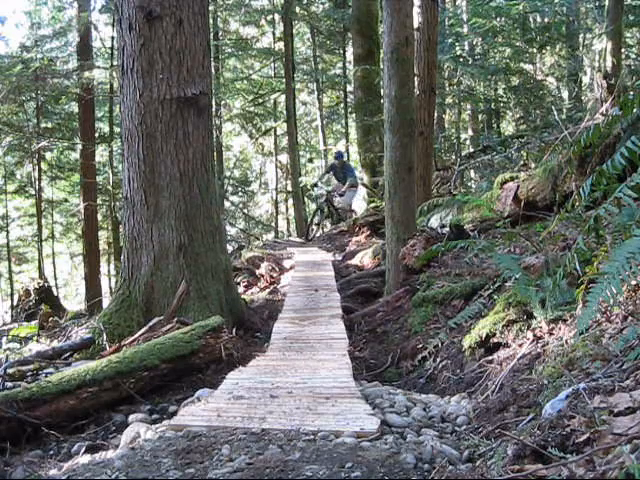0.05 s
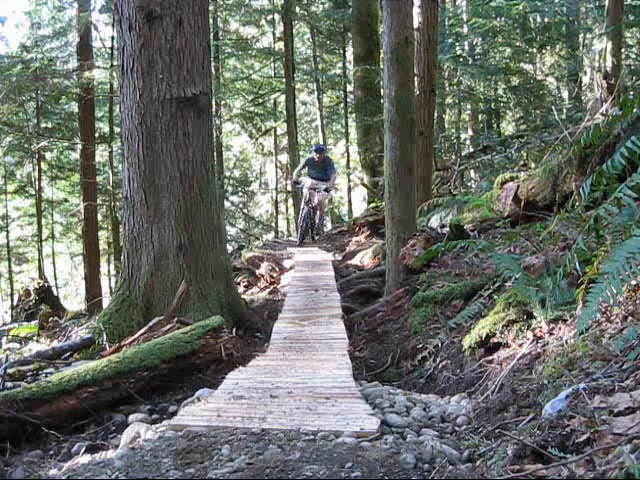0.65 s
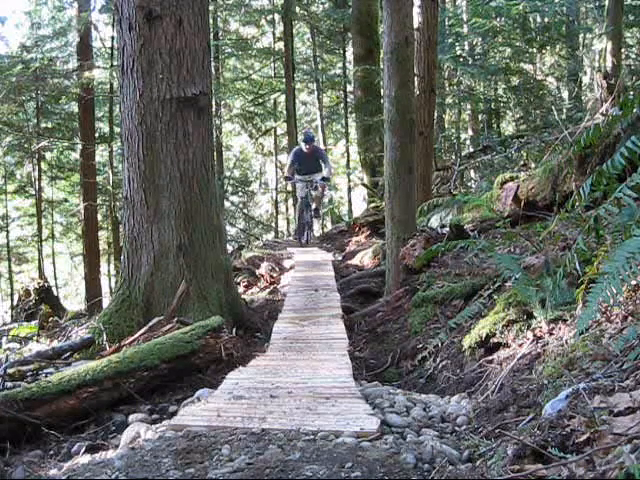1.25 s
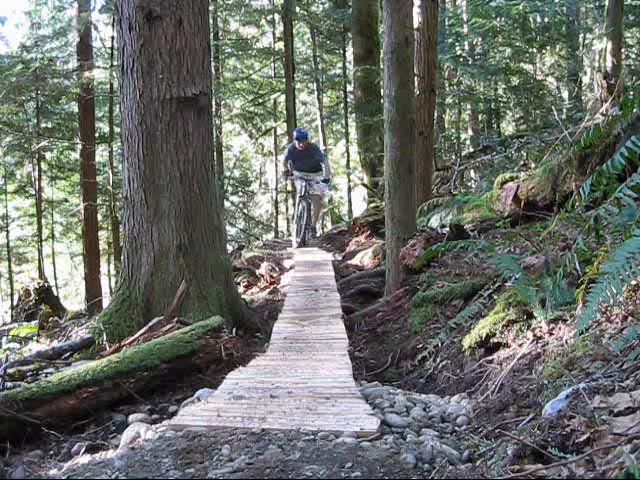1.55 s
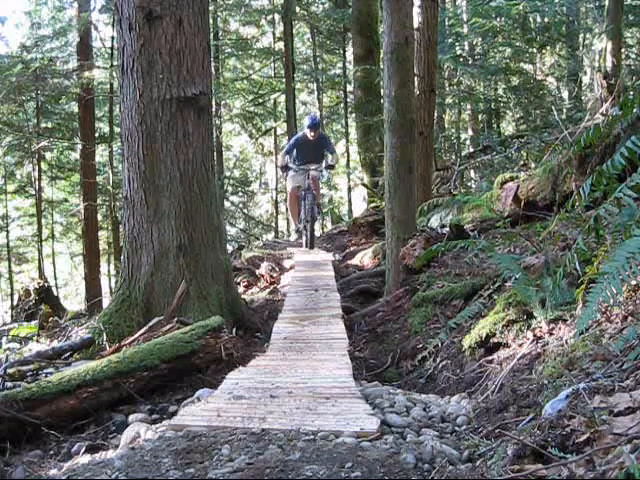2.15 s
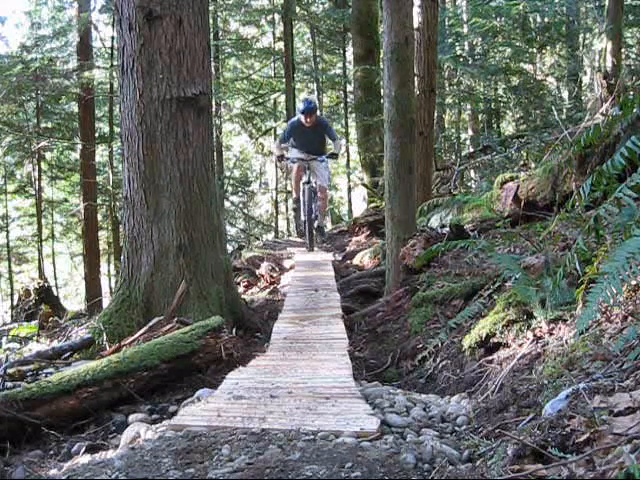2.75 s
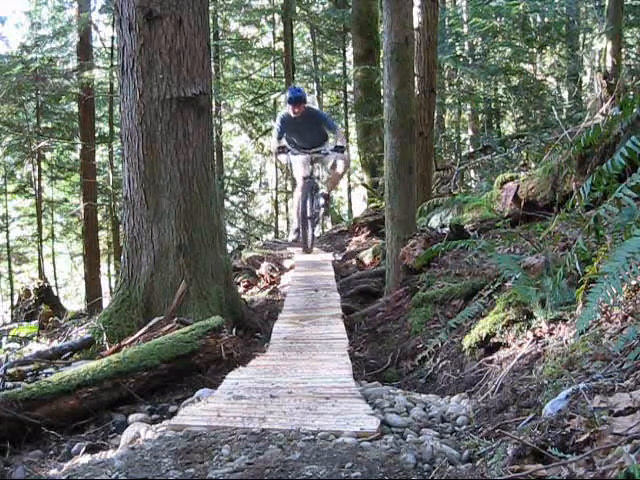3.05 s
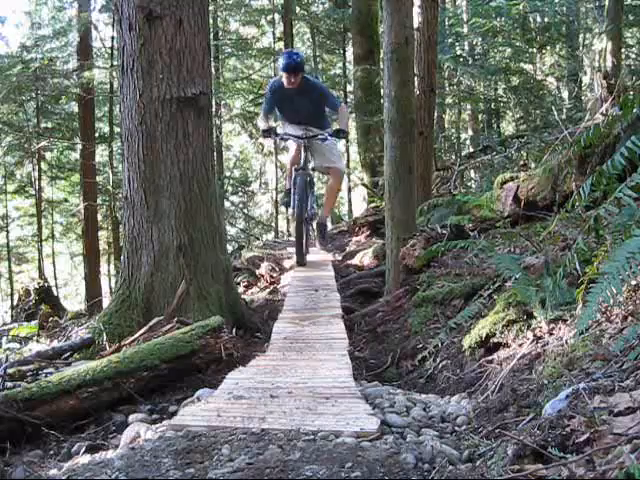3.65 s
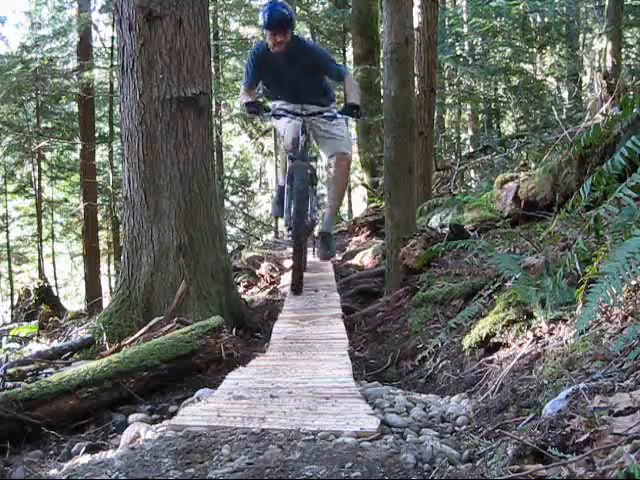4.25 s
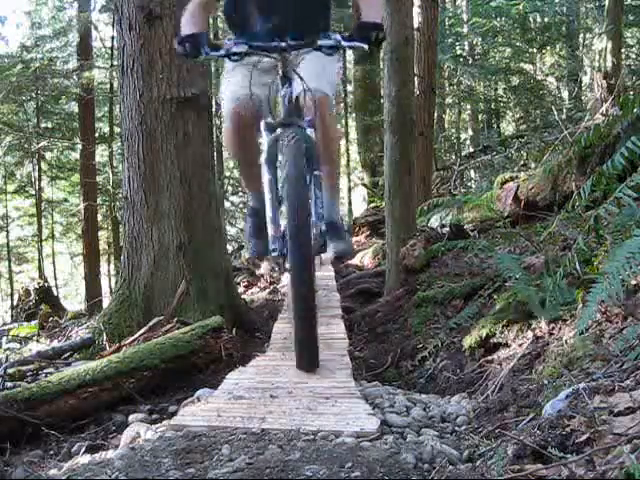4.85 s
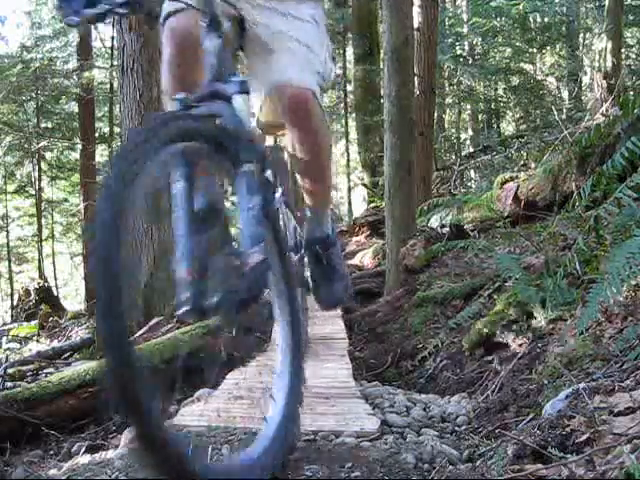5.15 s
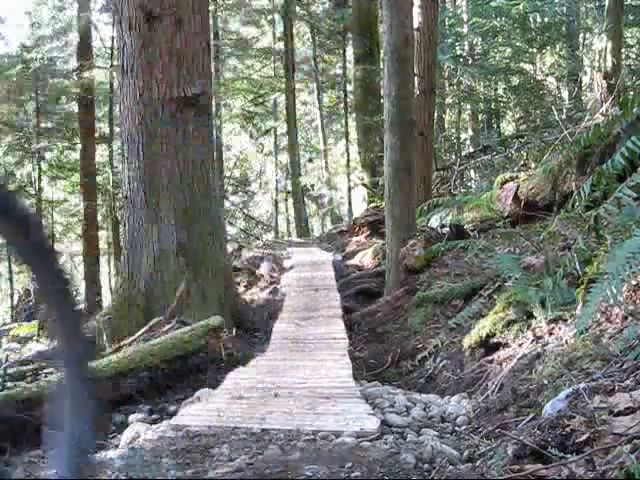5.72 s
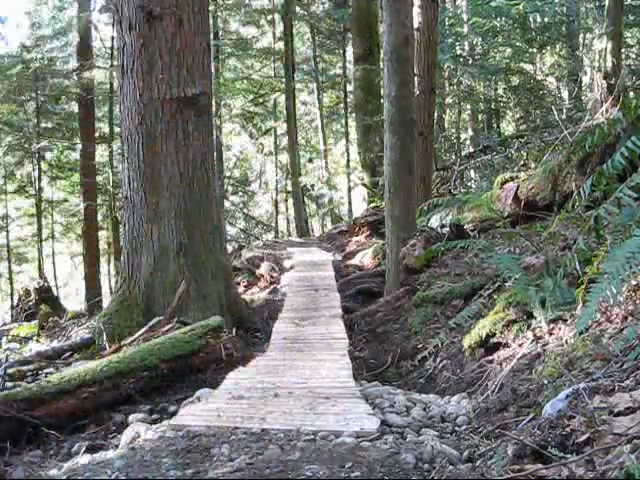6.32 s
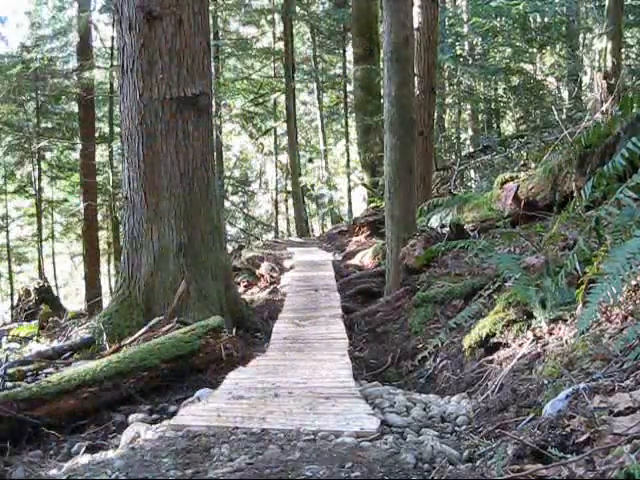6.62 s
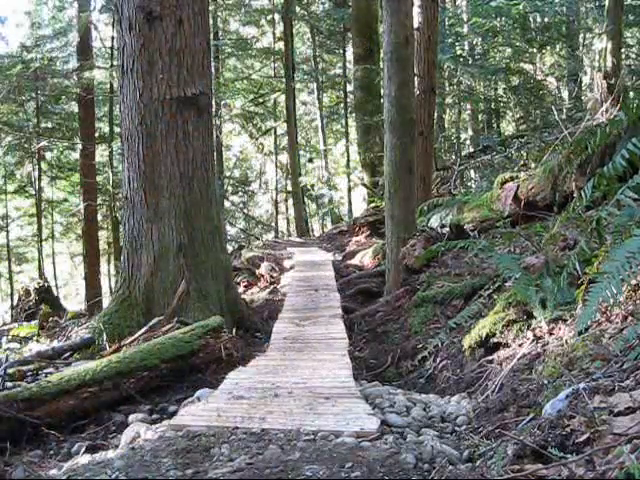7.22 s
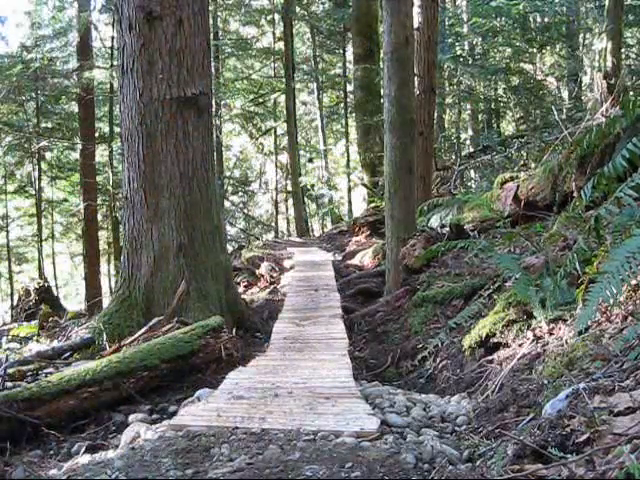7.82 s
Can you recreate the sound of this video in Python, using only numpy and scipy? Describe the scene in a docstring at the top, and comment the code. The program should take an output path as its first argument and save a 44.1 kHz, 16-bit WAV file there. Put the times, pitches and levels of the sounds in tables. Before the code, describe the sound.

In a quiet forest, distant bicycle tyres tick over stones and grow louder, drumming across a wooden plank bridge. The chain slaps the frame in sharp metallic clacks and boards knock hollowly. The bike passes right by the microphone with a crunch and spray of gravel, then rumbles away and fades. A small bird chirps faintly over a soft hush.

```python
"""Far tyres tick over stones in a forest hush: a mountain bike rolls down a trail, over a plank bridge,
onto gravel close by, and away. Its knobs drum on the boards, the tread scuffs and crunches grit,
the chain slaps the frame at bumps, stones knock and loaded planks ring hollow.
Behind it are a faint small bird, a short echo off the trunks and a low far hum."""
import sys
import numpy as np
from scipy import signal
from scipy.fft import rfft, irfft, next_fast_len
from scipy.io import wavfile
from scipy.ndimage import map_coordinates

SR = 44100
rng = np.random.default_rng(int(sys.argv[2]) if len(sys.argv) > 2 else 0)


def transcribe(u):
    """Save the signal u as a 16-bit wav file named by the first command-line argument.

    u: samples, shape (n,) or (channels, n), limited to [-1, 1]; the rate is SR.
    q: integer samples, one column per channel.
    """
    v = np.clip(np.atleast_2d(u).T, -1, 1)
    q = np.round(v * 32767).astype(np.int16)
    wavfile.write(sys.argv[1], SR, q)


N = 347640

# Tyre fader as the bike nears and leaves: t/s, level/dB
TYRE_FADER = [(0.0, -58), (0.44, -51.5), (2.06, -52), (2.65, -47.5), (2.74, -51), (3.58, -47.5),
              (3.71, -46), (4.1, -45), (4.32, -41), (4.45, -41.5), (4.65, -39), (4.83, -40), (5.79, -33),
              (5.9, -35.5), (6.25, -42.5), (6.76, -49.5), (7.33, -53), (7.88, -55.5)]
def tyre_level_db():
    """The fader that tyres and pebbles ride, near 0 dB at its peak."""
    return curve(TYRE_FADER) + 34


def tyres():
    """Rolling rubber in five layers, from low rumble to fine spray."""
    roll_db, scuff = tyre_level_db(), scuff_gain()
    jolt = np.tanh(wobble(38))  # the rumble and crunch swell and dip unevenly, without sudden surges
    return rumble(roll_db, jolt) + rasp(scuff) + crunch(roll_db, jolt, scuff) + grit(roll_db) + spray(roll_db)


# Body resonances of boards and tyre casing: f/Hz, width/Hz, level/dB
BOARD_MODES = [(110, 30, -8.5), (170.5, 29, -1.5), (189, 41, -6), (361, 44, -6), (450, 150, -2.5),
               (680, 170, -2.5), (970, 280, -7.5)]
# Thud EQ: f/Hz, level/dB
THUD_EQ = [(25, -10), (60, -24), (120, -5), (200, 8), (400, 7.5), (750, 3.5), (1200, -11), (2500, -36)]
# Low-end swells, off the bridge's end and on packed earth: t/s, attack/s, hold/s, release/s, boost/dB
BRIDGE_DROP = (5.52, 0.13, 0.087, 0.055, 3.7)
PACKED_EARTH = (6.08, 0.5, 0.63, 0.99, 7.9)
def rumble(roll_db, jolt):
    """Knobs drum on the boards over a bed of dull, uneven thuds."""
    knobs = contacts(rate=900, spread_db=2.5) * amp(2.7 * jolt)
    thuds = contacts(rate=900, spread_db=9) * amp(1.5 * jolt)
    level_db = -39.5 + 1.424 * roll_db + swell(*BRIDGE_DROP) + swell(*PACKED_EARTH)
    return amp(level_db) * (amp(-0.5) * resonate(knobs, BOARD_MODES) + amp(-4) * coloured(thuds, THUD_EQ))


# Steering scuff cues: t/s, length after the attack/s, level/dB
SCUFF_CUES = [(1.6, 0.1, -56.5), (2.136, 0.083, -46), (2.978, 0.28, -51), (3.805, 0.37, -50.5),
              (4.256, 0.17, -40), (4.645, 0.07, -43), (4.77, 0.13, -38), (5.207, 0.13, -38),
              (6.516, 0.19, -52)]
def scuff_gain():
    """Each scuff bites quickly, holds and lets go."""
    return sum(swell(s, attack=0.027, hold=0.44 * length, release=0.56 * length, height=amp(db))
               for s, length, db in SCUFF_CUES)


# Tread resonances: f/Hz, width/Hz, level/dB
TREAD_MODES = [(1260, 200, -0.5), (2080, 310, 1)]
def rasp(scuff):
    """The tread rubs sideways as the rider steers."""
    friction = rng.standard_normal(N) * amp(5 * wobble(90))
    return amp(-1) * scuff * resonate(friction, TREAD_MODES)


# Mid-forward crunch EQ: f/Hz, level/dB
CRUNCH_EQ = [(400, -5.5), (800, -8), (1150, -2.5), (1600, 1), (2150, 2.5), (3000, 0.5), (4500, -2.5),
             (6200, -8), (8500, -41), (16000, -28)]
def crunch(roll_db, jolt, scuff):
    """Each size of gravel cracks at its own moments, in its own octave; scuffs grind up more."""
    centres_hz = 700 * 2 ** np.arange(5)
    gravel = np.zeros(N)
    for octave in np.eye(5):
        cracks = amp(2 * jolt) * grains(rate=900, spread_db=6.5, t60=0.0061, hiss=0.44)
        gravel += filtered(cracks, lambda hz: np.sqrt(along(np.c_[centres_hz, octave], hz)))
    gain = np.hypot(amp(-35 + 1.333 * roll_db), amp(-2.5) * scuff)
    return gain * coloured(gravel, CRUNCH_EQ)


# Bright grit EQ: f/Hz, level/dB
GRIT_EQ = [(1500, -22), (4000, 8), (6500, 0), (10300, 5.5), (12000, 3.5), (15500, 1)]
def grit(roll_db):
    """Fine dirt sizzles under the tread."""
    sizzle = amp(3.7 * wobble(110)) * grains(rate=1200, spread_db=-1, t60=0.0031, hiss=1.66)
    return amp(-47.5 + 0.84 * roll_db) * coloured(sizzle, GRIT_EQ)


# Swell over the loose gravel: t/s, attack/s, hold/s, release/s, boost/dB
GRAVEL_PATCH = (5.167, 0.34, 0.5, 0.81, 11.3)
# Spray EQ: f/Hz, level/dB
SPRAY_EQ = [(1500, -9), (4000, 6), (6500, 2.5), (10300, 3), (12000, 3), (15500, 3)]
def spray(roll_db):
    """Sharp little stones fly from the wheels, only on the loose gravel."""
    stones = amp(3.3 * wobble(90)) * grains(rate=600, spread_db=7, t60=0.0053, hiss=0.5)
    looseness = amp(swell(*GRAVEL_PATCH)) - 1
    return amp(-43 + 0.84 * roll_db) * looseness * coloured(stones, SPRAY_EQ)


# Chain slap cues: t/s, level/dB, tilt/(dB per octave), high cut/Hz, t60/s
SLAP_CUES = [(2.457, -14.5, 2.5, 10000, 0.024), (2.5286, -16, 2.2, 11300, 0.038),
             (3.5385, -24.5, -1.5, 18000, 0.049), (3.648, -8, -0.4, 16000, 0.017),
             (3.6717, -26, -0.5, 12000, 0.058), (4.2372, -7, 3, 10800, 0.022),
             (4.733, -24, -2.5, 12000, 0.066), (4.7708, -24.5, -1.5, 12000, 0.043),
             (4.901, -31.5, -2.5, 11000, 0.038), (5.0483, -5, 2, 13700, 0.028),
             (5.371, -15.5, -1.5, 20000, 0.042), (5.755, -20, 0.5, 13000, 0.044),
             (5.815, -9.5, 4, 20000, 0.018), (5.9112, -14.5, -1.5, 20000, 0.054)]
# Metal ring of frame and chain: f/Hz, width/Hz, level/dB
FRAME_MODES = [(2800, 140, -4), (3360, 750, -1.5), (4120, 480, -4.5), (5020, 250, 0), (6160, 190, -2.5),
               (8770, 500, -10), (10200, 1600, -4.5), (13400, 890, -3), (15700, 980, -19)]
# EQ for the crack of steel links: f/Hz, level/dB
LINK_EQ = [(150, -37), (600, -13), (1200, -3), (2000, -5), (2900, 1), (4300, -2), (5700, -3.5), (7200, -6),
           (10500, -8.5), (13000, -7.5), (16000, -4)]
def chain():
    """Many links land within milliseconds and ring the frame; returns the direct sound and echo send."""
    direct, send = np.zeros(N), np.zeros(N)
    t = np.arange(SR // 6) / SR
    for s, db, tilt_db, top_hz, t60 in SLAP_CUES:
        rise = np.minimum(t / 0.0027, 1) ** 2
        blow = decay(np.maximum(t - 0.0025, 0), t60)
        settling = amp(-14) * decay(t, 0.084)
        envelope = rise * (blow + settling)
        links = contacts(rate=4600, spread_db=1.5, size=len(t)) + 2.55 * rng.standard_normal(len(t))
        # the chain never hits the same spot twice
        modes = [(hz * (1 + 0.0099 * rng.standard_normal()), width, level)
                 for hz, width, level in FRAME_MODES]
        hardness = lambda hz: amp(tilt_db * np.log2((hz + 500) / 5000)) / np.hypot(1, (hz / top_hz) ** 5)
        steel = lambda x: unit(filtered(coloured(x, LINK_EQ) + amp(1) * resonate(x, modes), hardness))
        strength = amp(db - 3) * np.sqrt(np.mean(envelope ** 2))
        add(direct, s, strength * steel(envelope * links))
        distance_m = np.hypot(0.9, 5.7 * (s - 7.25))  # riding at 5.7 m/s; far slaps are wetter
        send_db = -20.5 + 2.5 * np.log2(distance_m)
        # sent in all directions, the ripples of single links average out into one plain crack
        add(send, s, strength * amp(send_db) * steel(signal.unit_impulse(len(t), 128)))
    return direct, send


# Featured stone and twig hits: t/s, level/dB, f/Hz, spread/octaves
KNOCK_CUES = [(0.269, -43.5, 4600, 0.73), (0.378, -41, 5030, 0.73), (0.919, -46.5, 3120, 0.33),
              (1.264, -43.5, 4670, 0.28), (1.4386, -44, 3360, 0.32), (1.488, -40, 4220, 0.29),
              (1.578, -41.5, 1200, 0.84), (1.665, -46, 1150, 0.31), (1.9064, -40.5, 4020, 0.75),
              (2.6676, -38, 3630, 0.2), (3.0478, -41, 1540, 0.4), (3.1452, -42, 1960, 0.43),
              (3.153, -45.5, 9500, 0.6), (3.5268, -27, 3500, 0.14), (4.0737, -35, 4580, 1),
              (4.102, -37, 3630, 0.96), (4.4121, -31.5, 1400, 0.45), (4.6583, -34.5, 1580, 1.23),
              (4.6832, -33, 1650, 0.65), (4.7514, -29, 3340, 0.53), (4.946, -33, 1370, 0.3),
              (5.0323, -30, 1260, 0.37), (5.2135, -31, 3480, 0.77), (5.2849, -20.5, 3600, 0.42),
              (5.435, -30, 6000, 1.46), (5.585, -24.5, 6000, 1.2), (5.6118, -23.5, 1110, 1.04),
              (5.6802, -22, 2370, 0.68), (5.873, -23, 11300, 0.45), (5.884, -22.5, 11900, 0.42),
              (5.9286, -22.5, 12000, 0.3), (5.9699, -26.5, 7000, 1), (6.279, -36, 2170, 0.79),
              (6.379, -41, 2000, 1), (6.5872, -41.5, 800, 0.23), (6.6398, -40, 1510, 0.54),
              (6.9965, -31, 1070, 0.55), (7.4322, -34.5, 1130, 0.7)]
def knocks():
    """Dead little blows: hard contact, quick crumble, scrape; small stones are higher and stop sooner."""
    out = np.zeros(N)
    lead = 128  # samples of room for the filter's pre-ring
    t = np.arange(SR // 20) / SR
    for s, db, centre_hz, spread in list(KNOCK_CUES) + pebbles():
        crumble = 0.13 * decay(t, 0.00066)
        scrape = 0.11 * decay(t, 0.045 / (1 + (centre_hz / 5000) ** 2))
        blow = (t == 0) + (crumble + scrape) * rng.standard_normal(len(t))
        band = lambda hz: np.exp(-abs(np.log2((hz + 1) / centre_hz) / (2 * spread)) ** 3) / np.sqrt(hz + 200)
        knock = filtered(np.pad(blow, (lead, 0)), band)
        add(out, s - lead / SR, amp(db + 25) * knock / np.linalg.norm(knock))
    return out


def pebbles(per_s=15, spread_octaves=0.46):
    """Lesser stones strike at random, as loud as the tyres allow; returns extra knock cues."""
    slots = np.arange(int(per_s * N / SR))
    when, size, pitch = rng.random((len(slots), 3)).T
    s = (slots + when) / per_s
    db = -32.5 + 1.05 * tyre_level_db()[(s * SR).astype(int)] + 1.732 * (size - 0.5)
    # hard stones up the trail, duller knocks on boards and earth later
    hz = 2990 * 2 ** (1.316 * (pitch - 0.5) - 0.18 * s)
    return [(*row, spread_octaves) for row in zip(s, db, hz) if row[0] > 0.01]


# Hollow notes of boards and roots under the wheels: t/s, level/dB, f/Hz, t60/s
WOOD_CUES = [(3.5115, -37.5, 436, 0.028), (3.915, -42, 347, 0.087), (4.0422, -30.5, 485, 0.034),
             (4.6553, -33.5, 683, 0.15), (4.772, -29.5, 666, 0.069), (4.8294, -30, 680, 0.042),
             (5.279, -23, 700, 0.024), (5.680, -20, 770, 0.025), (5.7174, -21, 544, 0.024),
             (5.8017, -25, 350, 0.028), (6.62, -37, 262, 0.036), (7.4302, -26, 967, 0.038)]
def wood():
    """A loaded board rings briefly on its bending note and a faster-dying overtone."""
    out = np.zeros(N)
    t = np.arange(SR // 4) / SR
    attack = 1 - np.exp(-t / 0.00075)
    for s, db, hz, t60 in WOOD_CUES:
        note = np.sin(2 * np.pi * hz * t) * decay(t, t60)
        overtone = amp(1.5) * np.sin(2 * np.pi * 2.03 * hz * t) * decay(t, 0.42 * t60)
        add(out, s, amp(db) * attack * (note + overtone))
    return out


# Bird cues: t/s, length/s, start f/Hz, middle f/Hz, end f/Hz, level/dB
BIRD_CUES = [(2.007, 0.026, 6900, 6660, 7040, -49), (2.06, 0.033, 6750, 6100, 4480, -50),
             (2.24, 0.045, 6750, 6130, 4600, -53), (7.205, 0.029, 4300, 4200, 4050, -49),
             (7.352, .04, 5450, 5580, 5640, -56), (7.52, .04, 5350, 5500, 5380, -52)]
def bird():
    """Thin, quickly bending whistles."""
    out = np.zeros(N)
    for s, length, start_hz, middle_hz, end_hz, db in BIRD_CUES:
        progress = np.linspace(0, 1, int(length * SR))
        hz = np.polyval(np.polyfit([0, 0.5, 1], [start_hz, middle_hz, end_hz], 2), progress)
        add(out, s, amp(db - 2) * np.sin(np.pi * progress) * np.sin(2 * np.pi * np.cumsum(hz) / SR))
    return out


# Reverb time among the trunks: f/Hz, t60/s
TRUNK_DECAY = [(200, 0.51), (2500, 0.31), (6000, 0.6), (14000, 0.56)]
def trunk_echo(send):
    """Trunks scatter the sound back a little later, in a short dark tail."""
    reflections = contacts(rate=3800, spread_db=2.5, size=SR * 3 // 4)
    hz, t, bands = signal.stft(reflections, SR, nperseg=256)
    tail = signal.istft(bands * decay(t, along(TRUNK_DECAY, hz)[:, None]), SR, nperseg=256)[1]
    tail *= np.minimum(np.arange(len(tail)) / SR / 0.004, 1)  # 4 ms fade-in
    tail = filtered(tail, lambda hz: 1 / np.hypot(1, hz / 4800))  # bark and needles swallow the top
    return amp(-4.5) * signal.fftconvolve(send, tail / np.linalg.norm(tail))[:N]


# EQ of the bed of forest hush and microphone hiss: f/Hz, level/dB
HUSH_EQ = [(25, -1), (55, 2), (110, 5.5), (200, 4), (500, 1), (1200, 0), (2700, -3), (4400, -5),
           (6200, -10), (8600, -16), (9900, -12.5), (13000, -18.5), (15500, -17)]
def hush():
    """An even forest hush with faint microphone hiss."""
    return amp(-51 + 0.1 * wobble(2.85)) * coloured(rng.standard_normal(N), HUSH_EQ)


# Hum fader: t/s, level/dB
HUM_FADER = [(0, -66.5), (.7, -57), (2.5, -54), (3.7, -58), (4.5, -73), (5.3, -58.5), (6.5, -59),
             (7.9, -60.5)]
def far_hum():
    """A low tone, wavering slightly in pitch and level."""
    hz = 76.6 + 0.22 * wobble(2.5)
    return amp(curve(HUM_FADER) + wobble(3.1)) * np.sin(2 * np.pi * np.cumsum(hz) / SR)


def amp(db):
    """Decibels to gain."""
    return 10 ** (np.asarray(db) / 20)


def decay(t, t60):
    """A gain that falls 60 dB in t60 seconds."""
    return amp(-60 * t / t60)


def unit(x):
    """Scale to rms 1."""
    return x / np.sqrt(np.mean(x ** 2) + 1e-20)


def along(points, hz):
    """(Hz, value) points read on a log axis."""
    f, v = np.transpose(points)
    return np.interp(np.log(hz + 1), np.log(f + 1), v)


def curve(points):
    """(s, value) points read at every sample."""
    return np.interp(np.arange(N) / SR, *np.transpose(points))


def swell(start, attack, hold, release, height):
    """An envelope that rises to a height, holds and falls."""
    return np.interp(np.arange(N) / SR, start + np.cumsum([0, attack, hold, release]), [0, height, height, 0])


def wobble(rate):
    """A smooth random curve, rate knots a second."""
    return map_coordinates(rng.standard_normal(int(N * rate / SR) + 4), [np.arange(N) * rate / SR])


def filtered(x, response):
    """x times a response of frequency."""
    m = next_fast_len(len(x) + 8192)
    return irfft(rfft(x, m) * response(np.fft.rfftfreq(m, 1 / SR)), m)[:len(x)]


def coloured(x, eq):
    """x through an EQ curve, at rms 1."""
    return unit(filtered(x, lambda hz: amp(along(eq, hz))))


def resonate(x, modes):
    """x rung through (Hz, width, dB) resonances, at rms 1."""
    response = lambda f: sum(amp(db) * 1j * f * w / (c * c - f * f + 1j * f * w) for c, w, db in modes)
    return unit(filtered(x, response))


def contacts(rate, spread_db, size=N):
    """Random tiny impacts of uneven strength, rate a second, at rms 1."""
    strength = amp(spread_db * np.minimum(rng.standard_normal(size), 2))
    return unit((rng.random(size) < rate / SR) * strength * rng.choice([-1, 1], size))


def grains(rate, spread_db, t60, hiss):
    """Each contact is a tiny dying puff of noise, over a steady hiss."""
    t = np.arange(SR // 50) / SR
    power = signal.fftconvolve(contacts(rate, spread_db) ** 2, decay(t, t60) ** 2)[:N]
    puffs = unit(np.sqrt(np.abs(power)) * rng.standard_normal(N))
    return puffs + hiss * rng.standard_normal(N)


def add(track, s, sound):
    """Mix a sound into the track at a time."""
    part = track[round(s * SR):][:len(sound)]
    part += sound[:len(part)]


def scene():
    """Bike, bird and forest in mono; slaps, bumps and song feed the echo."""
    slaps, slap_send = chain()
    bumps, song = knocks() + wood(), bird()
    echo = trunk_echo(slap_send + amp(-14) * bumps + song)
    return (tyres() + slaps + bumps + song + echo + hush() + far_hum())[None]


def record(dry):
    """Master EQ: a narrow treble notch and a hard high cut."""
    notch_hz, half_width_hz, top_hz = 7900, 340, 15750
    notch = lambda hz: (hz - notch_hz) ** 2 / ((hz - notch_hz) ** 2 + half_width_hz ** 2)
    return filtered(dry[0], lambda hz: notch(hz) * (hz < top_hz))[None]


dry = scene()
out = record(dry)
transcribe(out)
```